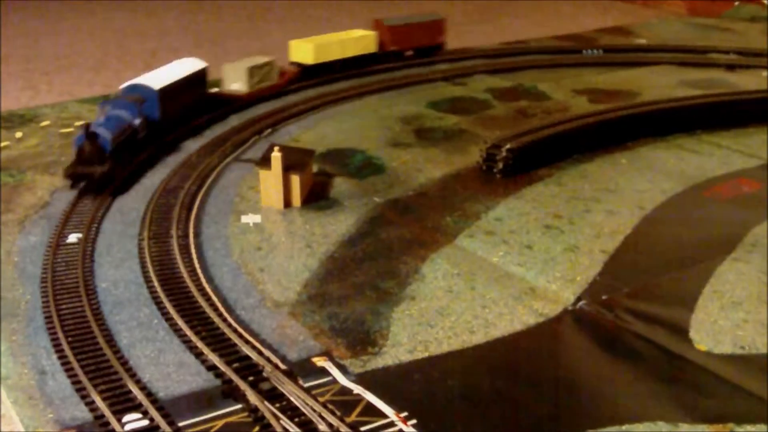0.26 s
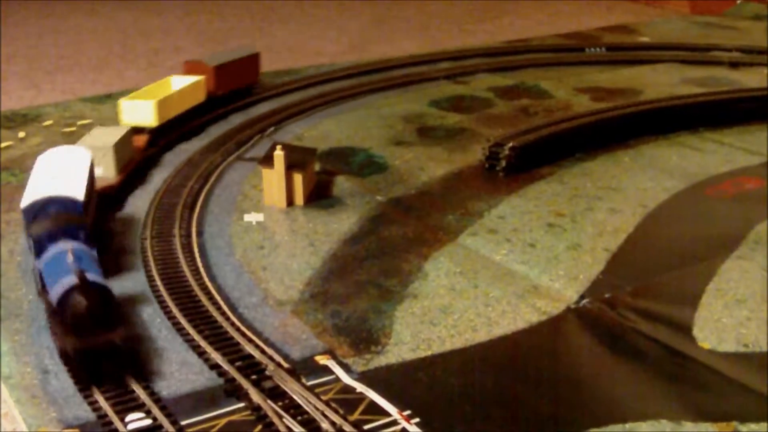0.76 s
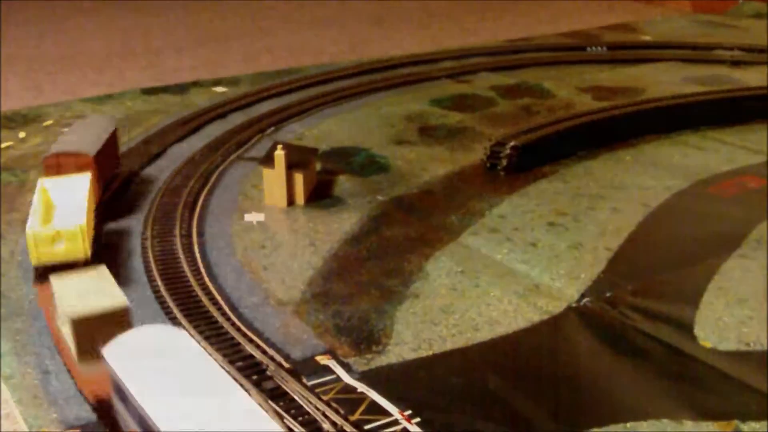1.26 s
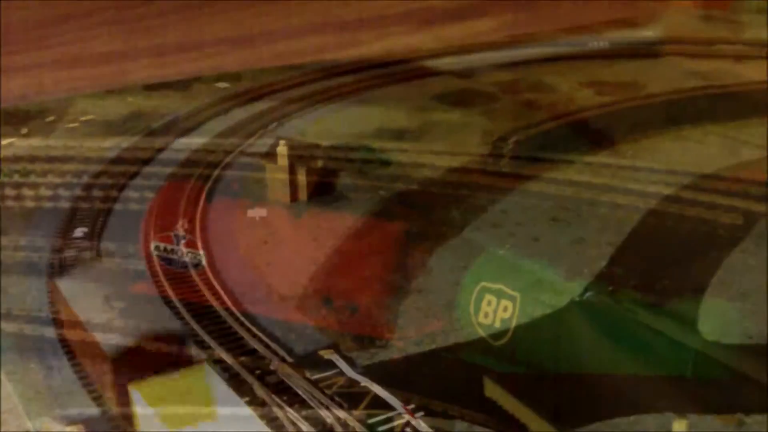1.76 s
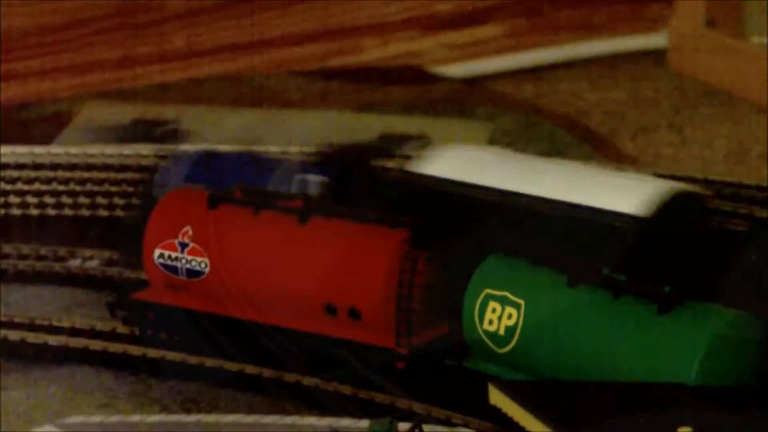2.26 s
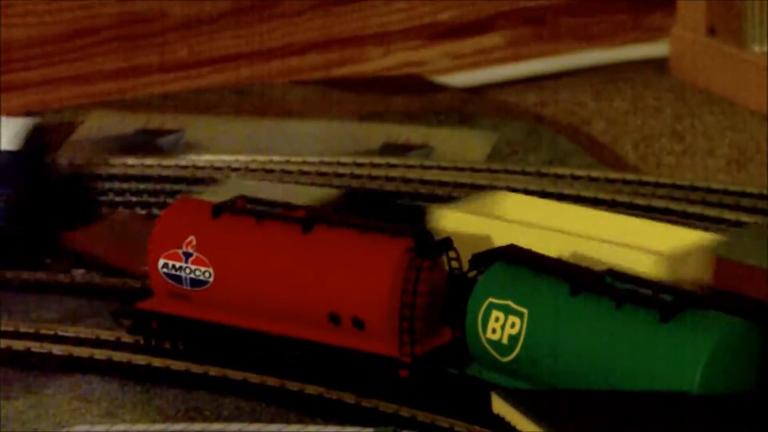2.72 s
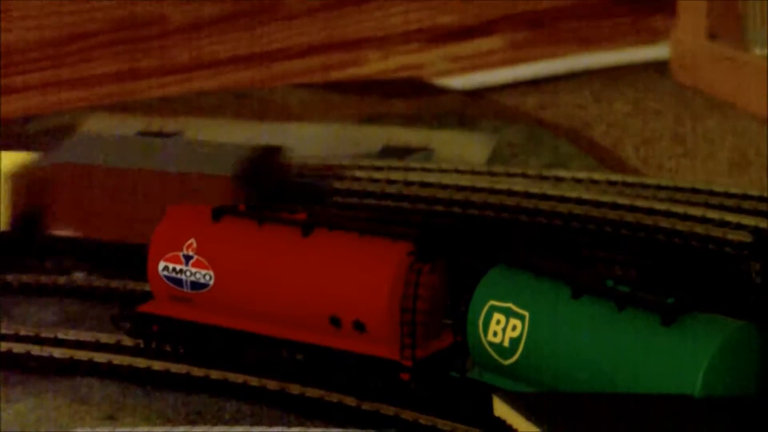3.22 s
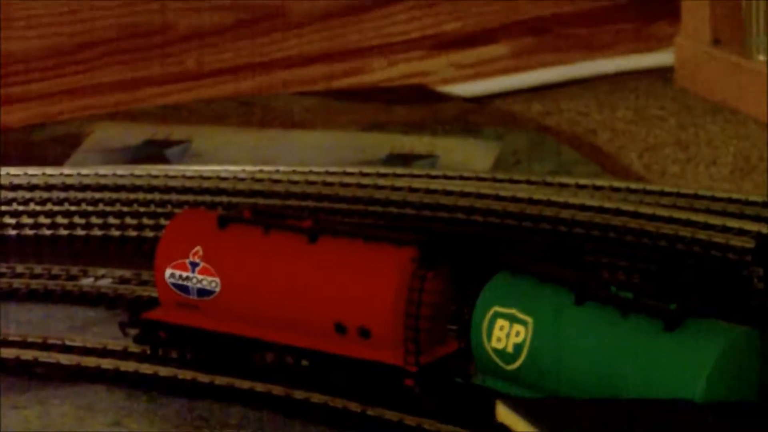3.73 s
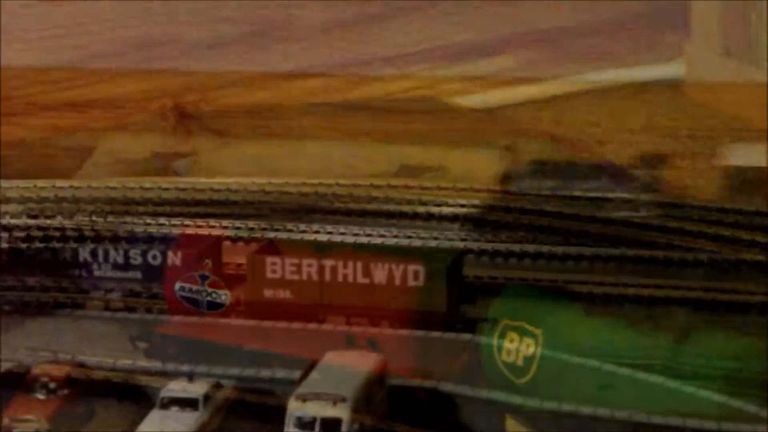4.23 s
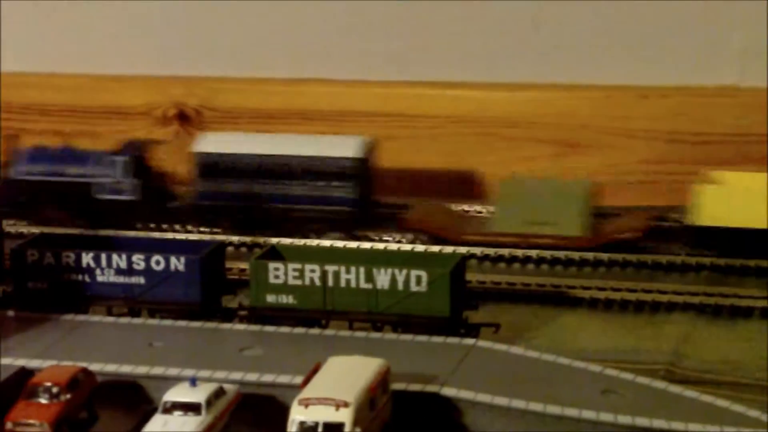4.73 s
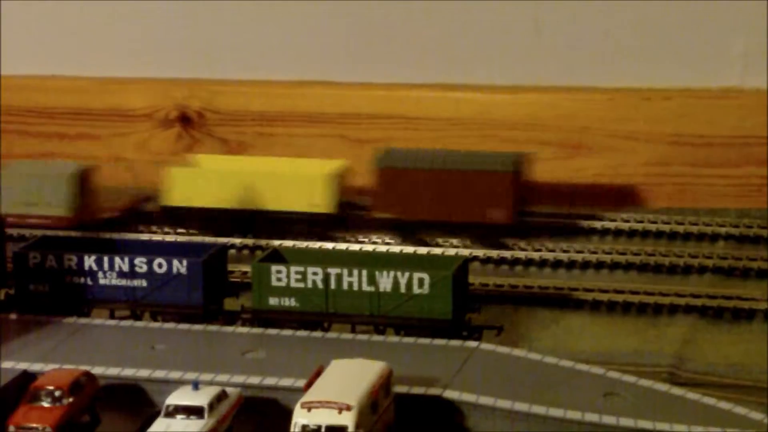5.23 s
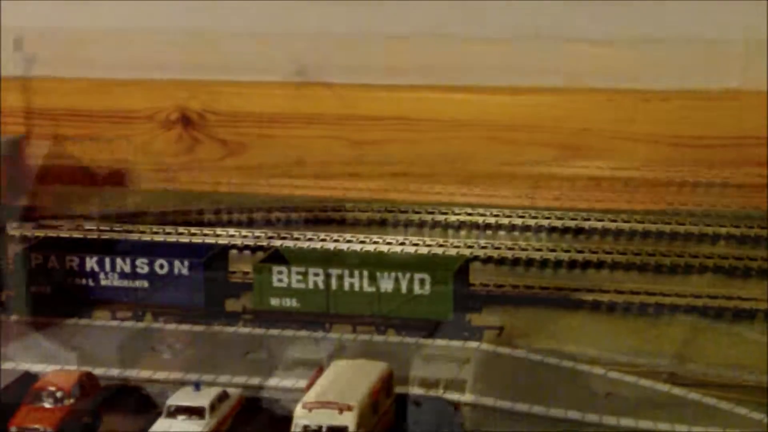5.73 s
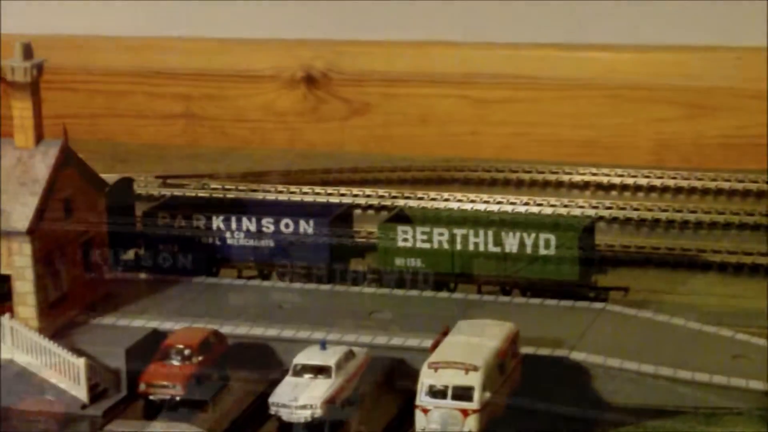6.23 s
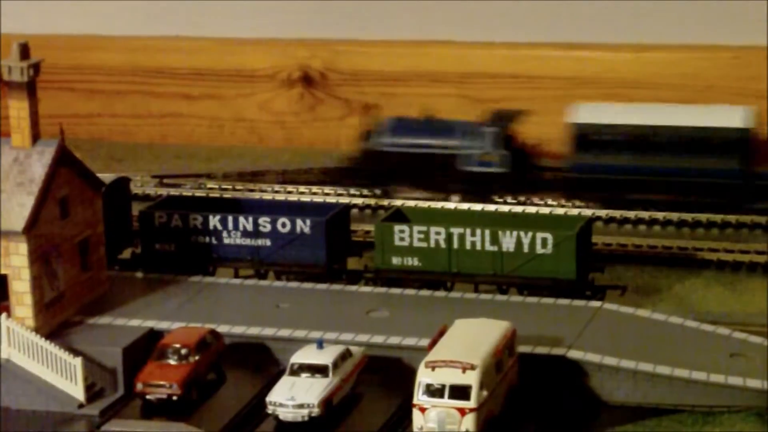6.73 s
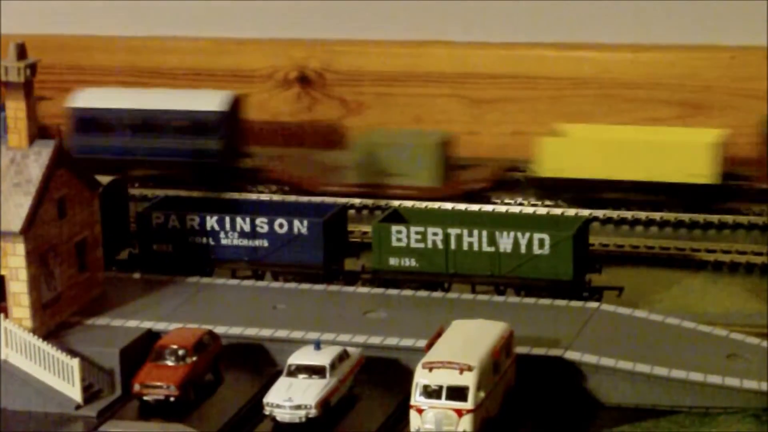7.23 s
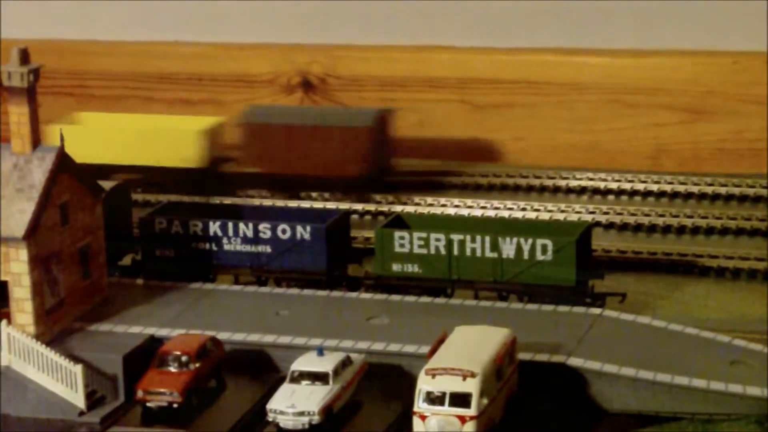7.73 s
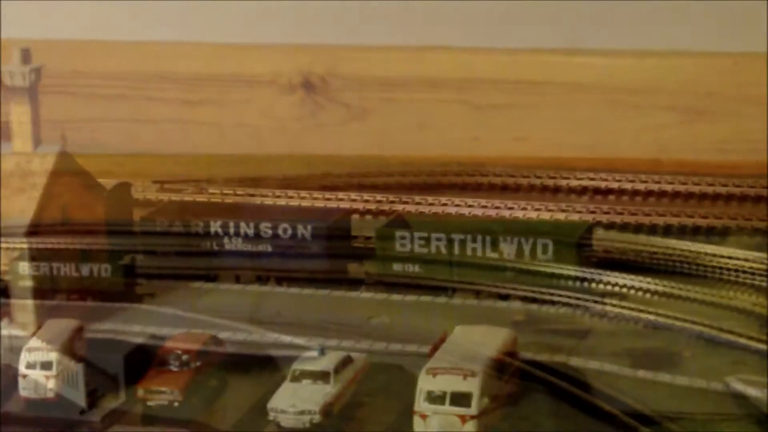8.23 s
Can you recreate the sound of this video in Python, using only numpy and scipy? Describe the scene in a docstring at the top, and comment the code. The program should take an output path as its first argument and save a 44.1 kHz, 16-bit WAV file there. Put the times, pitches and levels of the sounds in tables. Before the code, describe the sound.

Close, steady hiss and nasal whirr of a toy electric train, its faint motor whine rising early amid clicks and scrapes, then overlapping passes with light rattles.

```python
"""A model train circles an indoor layout, heard by a camera with a close pair of microphones.
From the start wheels hiss on rails, hollow bodies ring near 1.3 kHz, drive and gears whirr, the board murmurs:
rolling noise through resonances. From 0.7 to 2.1 s a faint harmonic motor whine rises in pitch.
Further spells of the train's running are mixed in, overlapping, from 1.2, 3.8, 5.6 and 8 s.
Flange scrapes, joint ticks and knocks crowd in until 2.1 s, then thin out among short rattles and dull booms."""
import sys
import numpy as np
from scipy import signal
from scipy.fft import rfft, irfft
from scipy.io import wavfile
from scipy.ndimage import uniform_filter1d

SR = 44100
rng = np.random.default_rng(int(sys.argv[2]) if len(sys.argv) > 2 else 0)


def store_pcm(level_fs):
    """Save levels as 16-bit WAV."""
    pcm = np.round(np.clip(level_fs, -1, 1) * 32767).astype(np.int16)
    wavfile.write(sys.argv[1], SR, np.atleast_2d(pcm).T)


N = 373527
T = np.arange(N) / SR
HZ = np.fft.rfftfreq(N, 1 / SR)


def from_db(db):
    """Level to amplitude ratio: 20 dB is a factor of ten."""
    return 10 ** (np.asarray(db) / 20)


def unit(x):
    """Normalisation to an rms of 1."""
    return x / np.sqrt(np.mean(x ** 2) + 1e-20)


def over_hz(points):
    """Interpolation of (f/Hz, value) rows on a logarithmic frequency axis."""
    hz, value = np.transpose(points)
    return np.interp(np.log(HZ + 1), np.log(abs(hz) + 1), value)


def over_time(rows):
    """Linear interpolation of rows (t/s, value, ..) in time; one curve per value column."""
    s, *columns = np.transpose(rows)
    return [np.interp(T, s, column) for column in columns]


def colour(x, gain):
    """Linear filtering: the spectrum is multiplied by a frequency response."""
    return irfft(rfft(x) * gain, N)


def resonances(modes):
    """Modal response: steep-sided resonances (f/Hz, half-power width/Hz, level/dB) add in power."""
    power = 0
    for hz, width, db in modes:
        detuning = (HZ - hz) / (np.pi / 4 * width)
        power = power + (from_db(db) / (1 + detuning ** 2)) ** 2
    return np.sqrt(power)


def wander(rate_hz, slowest_hz=4):
    """Random modulation: low-passed noise without its slowest part, rms 1."""
    response = (HZ > slowest_hz) / (1 + (HZ / rate_hz) ** 2)
    return unit(colour(rng.standard_normal(N), response))


def during(start, end, fade_s=0.0091):
    """Gating: 1 from start to end, with linear fades."""
    return np.clip(np.minimum(T - start, end - T) / fade_s + .5, 0, 1)


def bell(middle_s, width_s):
    """Gaussian envelope: a smooth swell from 0 to 1 and back."""
    return np.exp(-((T - middle_s) / width_s) ** 2)


def add(mix, s, sound):
    """Superposition: a sound joins the mix at time s."""
    at = round(s * SR)
    part, sound = mix[..., max(at, 0):], sound[..., max(-at, 0):]
    size = min(part.shape[-1], sound.shape[-1])
    part[..., :size] += sound[..., :size]


def contact(grit, flutter_db, flutter_hz, grains_per_s=750):
    """Rolling excitation: countless tiny impacts and sparse larger grains under an unsteady load."""
    # row 0 reaches both microphones alike; row 1 is the diffuse part that tells them apart
    grains = rng.standard_normal((2, N)) * (rng.random(N) < grains_per_s / SR)
    force = rng.standard_normal((2, N)) + grit * unit(grains)
    return force * from_db(flutter_db * wander(flutter_hz))


def reflections(sound, broad_db=0.56, fine_db=1.5, size=4096):
    """Interference of shifting echoes: broad drifting colours from near scenery, fine ones from walls."""
    hz, _, z = signal.stft(sound, SR, nperseg=size)
    a, b = rng.standard_normal((2, *z.shape[1:]))
    # random gains, smoothed over frequency and then over time
    broad = unit(uniform_filter1d(uniform_filter1d(a, size=45, axis=0), size=7, axis=1))
    fine = unit(uniform_filter1d(uniform_filter1d(b, size=3, axis=0), size=6, axis=1))
    gain = from_db(broad_db * broad + fine_db * fine)
    return signal.istft(z * unit(gain), SR, nperseg=size)[1][:, :N]


def band(hz, width_hz):
    """Narrow-band noise as a modulated carrier whose centre may glide; rms 1."""
    detuning = np.fft.fftfreq(N, 1 / SR) / (np.pi / 4 * width_hz)
    slow = np.fft.ifft(np.fft.fft(rng.standard_normal((2, N))) / (1 + detuning ** 2))
    carrier = np.exp(2j * np.pi * np.cumsum(hz * np.ones(N)) / SR)
    return unit((slow * carrier).real)


def swells(rows, width_hz):
    """Transient resonance: short Gaussian swells of noise, each in a resonance of its own."""
    t, out = T[:SR], np.zeros((2, N))
    hz = np.fft.rfftfreq(SR, 1 / SR)
    for s, length, centre_hz, db in rows:
        response = 1 / (1 + ((hz - centre_hz) / width_hz) ** 2)
        noise = irfft(rfft(rng.standard_normal((2, SR))) * response, SR)
        shape = np.exp(-(2 * (t - t.mean()) / length) ** 2)
        strength = np.sqrt(np.sum((noise * shape) ** 2, axis=1, keepdims=True) / np.sum(shape ** 2))
        add(out, s - t.mean(), from_db(db) * shape * noise / strength)
    return out


# overlapping spells of running, mixed together: start t/s, end t/s,
# t/s with the engine halfway along the straight, level/dB relative to the layer, fade-in t/s
SPELLS = [(-0.1, 2.172, 4.87, -0.4, .01), (1.19, 4.637, 4.2, 0.3, .015), (3.83, 6.212, 4.68, 0.2, .08),
          (5.57, 8.6, 6.9, -0.1, .07), (7.99, 8.6, 10.0, -5.5, .05)]
# the points come this long before the straight
POINTS_LEAD_S, POINTS_WIDTH_S = 3.06, 0.5


def lap_level(curve_db, points_db, straight_db, lag_s, width_s):
    """Incoherent addition: a layer's level/dB follows the place on the lap, and spells add in power."""
    # level in the curves, gain over the points, and change along the straight
    power = 1e-12
    for start, end, straight_s, spell_db, rise_s in SPELLS:
        on_points = bell(straight_s - POINTS_LEAD_S, POINTS_WIDTH_S)
        on_straight = bell(straight_s + lag_s, width_s)
        db = spell_db + curve_db + points_db * on_points + straight_db * on_straight
        present = during(start, np.inf, rise_s) * during(-np.inf, end)
        power = power + present * from_db(db) ** 2
    return 10 * np.log10(power)


# spectrum of the baseboard, overall level left open: f/Hz, relative level/dB per Hz
BOARD_SPECTRUM = [(20, -19), (90, -42), (150, -17.5), (200, -14), (240, -18.5), (330, -4.5), (390, -3),
                  (470, -1), (590, 4), (760, 4.5), (1100, -3), (1900, -33), (3000, -45)]
# booms of the board under the wagons, before the bass cut: middle t/s, length t/s, f/Hz, level/dB
BOOMS = [(2.7, .08, 600, -64), (3.15, 0.22, 599, -60), (5.05, 0.26, 640, -63), (6.07, 0.24, 624, -60.5),
         (7.35, 0.22, 638, -67.5)]
# rumble round the lap, before the trim
RUMBLE = dict(curve_db=-64, points_db=5.5, straight_db=4.5, lag_s=-0.35, width_s=1.45)


def baseboard(trim_db=-1.26, boom_cut_hz=380):
    """Plate radiation: rolling forces make the board rumble, dull and lumpy, and boom here and there."""
    force = contact(grit=0.34, flutter_db=1.77, flutter_hz=17, grains_per_s=140)
    rumble = unit(reflections(colour(force, from_db(over_hz(BOARD_SPECTRUM))), broad_db=0.54, fine_db=2.0))
    bass_cut = 1 / np.hypot(1, (boom_cut_hz / (HZ + 1)) ** 4)
    booms = colour(swells(BOOMS, width_hz=170), bass_cut)
    return from_db(lap_level(**RUMBLE) + trim_db) * rumble + booms


# chassis drones and wheel rings that sound for a while:
# start t/s, end t/s, f/Hz, half-power width/Hz, level/dB
DRONES_AND_RINGS = [(-0.2, 1.3, 380, 54, -74.5), (1.6, 2.1, 2256, 57, -50.5), (2.5, 3.4, 428, 34, -74),
                    (2, 7.7, 2480, 55, -66)]


def drones_and_rings(fade_s=.15):
    """Sustained resonance: chassis drones and wheel rings sound for a while, each at its own pitch."""
    out = np.zeros((2, N))
    for start, end, hz, width, db in DRONES_AND_RINGS:
        ring = unit(colour(rng.standard_normal((2, N)), resonances([(hz, width, 0)])))
        out += from_db(db) * during(start, end, fade_s) * ring
    return out


# wheels tick over joints, before the rail colours them: t/s, level/dB
TICKS = [(1.199, -25), (1.27, -28), (1.332, -24), (1.394, -24.5), (1.591, -22), (1.717, -23), (1.75, -22),
         (1.769, -22), (2.07, -23), (4.257, -33), (5.926, -25), (5.994, -28), (6.431, -28)]
# wagons jolt the board, before its bass cut: t/s, peak level/dB, f/Hz, rise to the peak t/s
KNOCKS = [(1.662, -42, 756, 0.00081), (2.0947, -24.6, 890, 0.00076), (2.432, -56, 650, .0012),
          (3.304, -46, 560, .0012), (3.315, -42.5, 720, 0.0013), (5.556, -48, 550, 0.002)]


def joints(tick_t60=0.012, board_hz=380):
    """Impact excitation: rail joints tick the wheel brightly or knock the board, which radiates little bass."""
    t, ticks, knocks = T[:SR // 2], np.zeros(N), np.zeros(N)
    for s, db in TICKS:
        decay = np.exp(-np.log(1000) * t / tick_t60)
        add(ticks, s, from_db(db) * decay * rng.standard_normal(len(t)))
    for s, db, hz, rise in KNOCKS:
        swell = (t / rise * np.exp(1 - t / rise)) ** 2
        add(knocks, s, from_db(db) * swell * np.sin(2 * np.pi * hz * t))
    ticks = colour(ticks, from_db(over_hz(RAIL_SPECTRUM)))
    knocks = colour(knocks, 1 / np.hypot(1, (board_hz / (HZ + 1)) ** 3))
    return np.outer([1, 0], ticks + knocks)


# narrow chassis resonance: f/Hz, half-power width/Hz, relative level/dB
HUM_MODE = (868, 18, 0)
# hum before the trim: t/s, level/dB
HUM_LEVEL = [(0, -65), (0.8, -60), (1.4, -59), (2.2, -69), (3.1, -62), (3.6, -73), (4.1, -63), (5.3, -70),
             (6.05, -58.5), (6.9, -69), (7.5, -63), (8, -61), (8.47, -63)]


def hum(trim_db=-3.5):
    """High-Q resonance: noise through one narrow chassis mode sings a faint, restless note."""
    note = unit(colour(rng.standard_normal((2, N)), resonances([HUM_MODE])))
    return from_db(over_time(HUM_LEVEL)[0] + trim_db) * note


# the motor gathers speed as it passes the camera: t/s, shaft f/Hz, rms level of the whine/dB
MOTOR = [(.7, 57, -92), (.87, 57.6, -77.5), (1.0, 59.3, -76), (1.2, 61, -75.5), (1.36, 62.7, -69),
         (1.52, 63.7, -67.5), (1.65, 64.6, -75), (1.85, 65.4, -79), (2.1, 65.6, -92)]


def motor(waver=.002, drone_db=-80.3, third_db=-6):
    """Harmonics of rotation: gear whine at 5 times the shaft rate, drone at 2 and 3; all rise with speed."""
    shaft_hz, whine_db = over_time(MOTOR)
    turn = 2 * np.pi * np.cumsum(shaft_hz * (1 + waver * wander(12))) / SR
    drone = np.sin(2 * turn) + from_db(third_db) * np.sin(3 * turn)
    drone = drone * from_db(drone_db) * during(1.2, 1.9, fade_s=0.08)
    whine = from_db(whine_db) * np.sin(5 * turn)
    return np.outer([1, 0], np.sqrt(2) * (whine + drone))  # root 2: rms to peak


# gear resonances: f/Hz, half-power width/Hz, relative level/dB
GEAR_MODES = [(1460, 80, -1.5), (1534, 97, 6), (1640, 60, -5.5), (1656, 70, -3)]
# gear rasp before the trim: t/s, level/dB
GEAR_LEVEL = [(0, -56.5), (0.55, -55), (0.67, -59), (0.97, -57), (1.17, -59), (1.21, -53), (1.55, -51),
              (1.85, -55), (2.14, -56), (2.2, -57), (3.2, -56.0), (3.7, -62), (3.9, -57), (4.25, -55),
              (4.7, -59.5), (5.5, -60), (5.9, -53.5), (6.3, -56.5), (7.15, -56), (7.8, -62), (8.05, -55),
              (8.47, -63)]


def gears(trim_db=-0.5):
    """Modal filtering: the gears rasp through resonances just above the ring of the bodies."""
    rasp = colour(contact(grit=0.19, flutter_db=0.5, flutter_hz=25), resonances(GEAR_MODES))
    return from_db(over_time(GEAR_LEVEL)[0] + trim_db) * unit(rasp)


# chassis resonances: f/Hz, half-power width/Hz, relative level/dB
DRIVE_MODES = [(880, 64, -6.5), (919, 36, 0.5), (1110, 210, -1.5)]
# whirr round the lap, before the trim
WHIRR = dict(curve_db=-59, points_db=6.5, straight_db=-6.5, lag_s=0.07, width_s=0.95)


def drive(trim_db=1.6):
    """Structure-borne sound: the motor whirrs through the resonances of the chassis."""
    whirr = colour(contact(grit=0.25, flutter_db=0.0, flutter_hz=25), resonances(DRIVE_MODES))
    return from_db(lap_level(**WHIRR) + trim_db) * unit(whirr)


# drifting resonance of the whirr: t/s, f/Hz, level/dB
WHIRR_GLIDE = [(0, 930, -68), (.7, 980, -63), (1.0, 1015, -57), (1.5, 928.3, -61), (2.1, 940, -56),
               (2.25, 953, -70), (2.9, 965, -59), (3.25, 1041, -59), (3.75, 1146, -58), (4.2, 1150, -59),
               (4.7, 1040, -65), (5.2, 1000, -72)]


def whirr_glide():
    """Time-varying resonance: one broad mode of the whirr drifts as the train moves along the board."""
    hz, level_db = over_time(WHIRR_GLIDE)
    return from_db(level_db) * band(hz, width_hz=130)


# flanges scrape in the curves and over the points: middle t/s, length t/s, f/Hz, level/dB
SCRAPES = [(0.699, 0.7, 5330, -59), (1.279, 0.12, 2750, -50), (1.428, 0.25, 3700, -44),
           (1.599, 0.14, 3640, -39.5), (1.617, 0.18, 2510, -48), (1.762, 0.15, 3800, -42),
           (1.799, 0.22, 2900, -51), (1.873, 0.093, 4140, -42), (1.908, 0.13, 2980, -41.5),
           (2.017, 0.096, 2670, -40.5), (2.06, .12, 5800, -50), (2.08, .07, 3700, -44),
           (2.123, 0.14, 2580, -44), (2.32, 0.16, 5330, -54), (5.95, 0.24, 3900, -54),
           (6.1, .18, 3020, -52.5), (6.38, .12, 2500, -54), (8.435, .14, 2970, -53)]


def flanges():
    """Friction noise: flanges scrape the rails in short swells of hiss, each with its own colour."""
    return swells(SCRAPES, width_hz=460)


# resonances of the hollow bodies: f/Hz, half-power width/Hz, relative level/dB
BODY_MODES = [(1173, 43, -3.5), (1261, 36, 0.5), (1325, 38, -1.5), (1394, 57, -4)]
# ring of the bodies before the trim: t/s, level/dB
RING_LEVEL = [(0, -54.5), (0.3, -51.5), (0.55, -62), (0.75, -52), (1.17, -53.5), (1.21, -48), (1.7, -46.5),
              (1.95, -51), (2.15, -48), (2.2, -52.5), (2.75, -51.5), (2.95, -57), (3.25, -52.0), (3.8, -50),
              (3.87, -48), (4.5, -45.5), (4.68, -48.5), (5.4, -49.5), (6.18, -49.5), (6.26, -51.5),
              (6.65, -46.5), (7.05, -48), (7.3, -49), (7.65, -49.5), (7.9, -51.5), (8.47, -51)]
# a body rattles or a gear resonance swells for a moment: middle t/s, length t/s, f/Hz, level/dB
RATTLES_AND_SWELLS = [(.27, .09, 1262, -50.5), (.44, 0.11, 1645, -52.5), (.95, 0.16, 1550, -51.5),
                      (1.403, .026, 1310, -42), (1.68, .11, 1300, -49), (2.504, 0.054, 1340, -51),
                      (2.73, 0.072, 1260, -52), (3.412, .052, 1330, -44), (3.95, .14, 1280, -48.5),
                      (4.34, 0.055, 1340, -50), (4.51, .016, 1273, -40), (4.796, .018, 1330, -42),
                      (6.628, 0.034, 1330, -46), (6.728, .03, 1320, -50), (7.002, .1, 1280, -46),
                      (7.41, 0.025, 1333, -52), (7.503, 0.048, 1260, -48), (7.588, 0.03, 1270, -49),
                      (7.75, .024, 1300, -49)]


def bodies(trim_db=-0.74):
    """Forced vibration: hollow plastic bodies ring under the rolling."""
    ring = unit(colour(contact(grit=0.49, flutter_db=-0.5, flutter_hz=30), resonances(BODY_MODES)))
    return ring * from_db(over_time(RING_LEVEL)[0] + trim_db)


def rattles_and_swells():
    """Transient resonance: a body rattles or a gear resonance swells for a moment."""
    return swells(RATTLES_AND_SWELLS, width_hz=45)


# spectrum of wheel on rail, which also colours the joint ticks: f/Hz, relative level/dB per Hz
RAIL_SPECTRUM = [(200, -25.5), (700, -15.5), (1500, -4), (1860, -4.5), (2150, -3), (2450, -1),
                 (3250, -0.96), (3850, -0.5), (4200, -3), (4650, -6.5), (5700, -6.5), (7400, -10.5),
                 (9800, -14), (12500, -24), (15300, -37)]
# hiss and its treble round the lap, before the trim
HISS = dict(curve_db=-48.5, points_db=6.5, straight_db=-3.5, lag_s=0.9, width_s=0.5)
TREBLE = dict(curve_db=-48, points_db=0.3, straight_db=-1.36, lag_s=0.19, width_s=0.47)
# closest approach to the camera: when, for how long, and how much treble it adds
CLOSE_S, CLOSE_WIDTH_S, CLOSE_TREBLE_DB = 1.46, 0.86, 5


def wheels(trim_db=1.89, treble_from_hz=4750):
    """Roughness noise: wheels hiss on the rails, with a treble that has a level of its own."""
    hiss_db = lap_level(**HISS)
    treble_db = lap_level(**TREBLE) + CLOSE_TREBLE_DB * bell(CLOSE_S, CLOSE_WIDTH_S)
    force = contact(grit=0.31, flutter_db=0.53, flutter_hz=49.5)
    hiss = unit(reflections(colour(force, from_db(over_hz(RAIL_SPECTRUM)))))
    treble = colour(hiss, 1 / (1 + (treble_from_hz / (HZ + 1)) ** 6))
    return from_db(hiss_db + trim_db) * (hiss + (from_db(treble_db - hiss_db) - 1) * treble)


# likeness of the two microphones: f/Hz, coherence
SAME = [(30, .98), (150, .965), (350, .9985), (1300, .9995), (2500, .972), (5000, .94), (9000, .9),
        (14000, .5)]
# phase by which the left one lags: f/Hz, phase/rad
LAG = [(0, 0), (700, .005), (1400, .02), (2000, .15), (4400, .5), (7500, .93), (12400, 1.6), (15000, 2.9)]


def microphones(sound):
    """Spatial coherence: two close ports agree in the bass and part in phase and likeness in the treble."""
    same = np.clip(over_hz(SAME), -1, 1)
    turn = np.exp(-.5j * over_hz(LAG))
    shared = colour(sound[0], np.sqrt((1 + same) / 2))
    diffuse = colour(sound[1], np.sqrt((1 - same) / 2))
    return np.array([colour(shared + diffuse, turn), colour(shared - diffuse, 1 / turn)])


def scene(rail_cut_hz=200):
    """Superposition of sources: rolling noise in every spell, the motor's whine only in the first."""
    # thin rails radiate little bass
    rails = colour(wheels() + flanges(), HZ / np.hypot(HZ, rail_cut_hz))
    first_start, first_end = SPELLS[0][:2]
    engine = drive() + whirr_glide() + gears() + hum() + during(first_start, first_end) * motor()
    resonant = drones_and_rings() + bodies() + rattles_and_swells()
    return microphones(baseboard() + joints() + engine + resonant + rails)


def record(dry, notch_hz=7855, notch_width_hz=85, edge_hz=15500):
    """Frequency response of the camera: a narrow notch in the treble and a steep band limit."""
    off = (HZ - notch_hz) / notch_width_hz
    notch = off ** 2 / (1 + off ** 2)
    return colour(dry, notch / np.hypot(1, (HZ / edge_hz) ** 120))


dry = scene()
out = record(dry)
store_pcm(out)
```